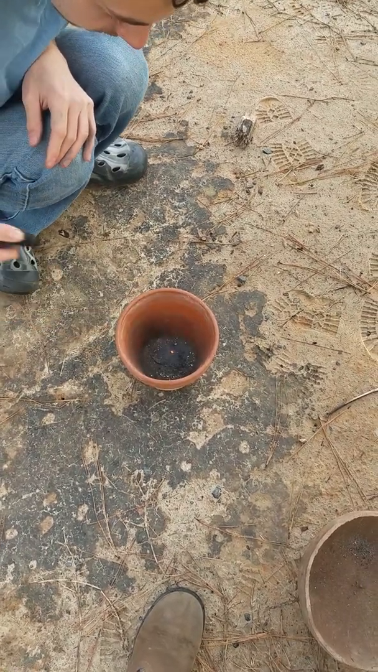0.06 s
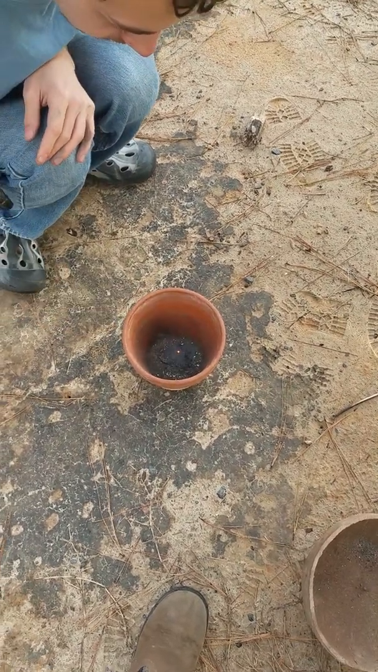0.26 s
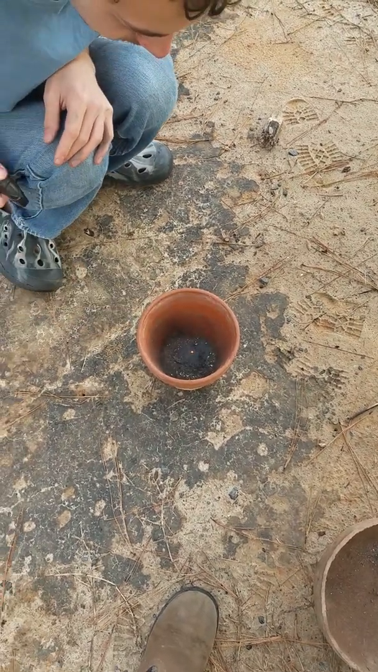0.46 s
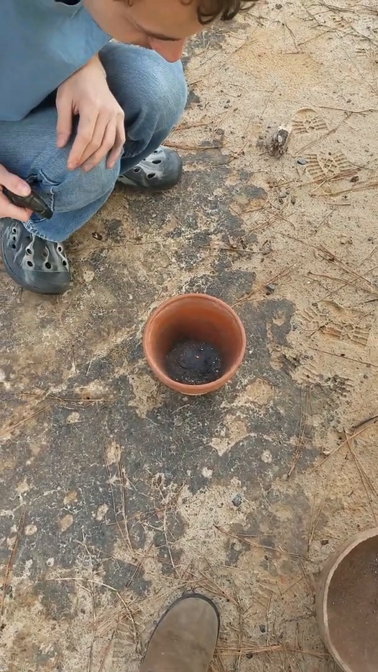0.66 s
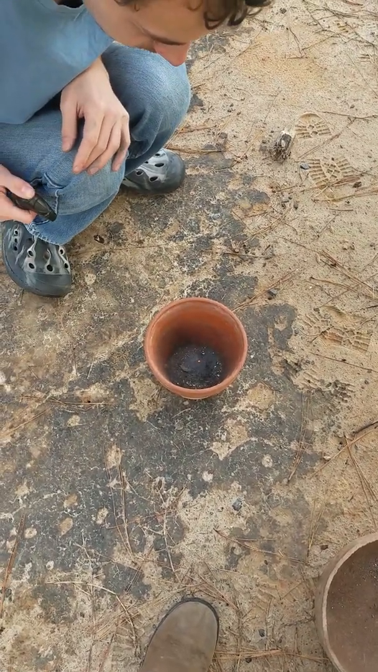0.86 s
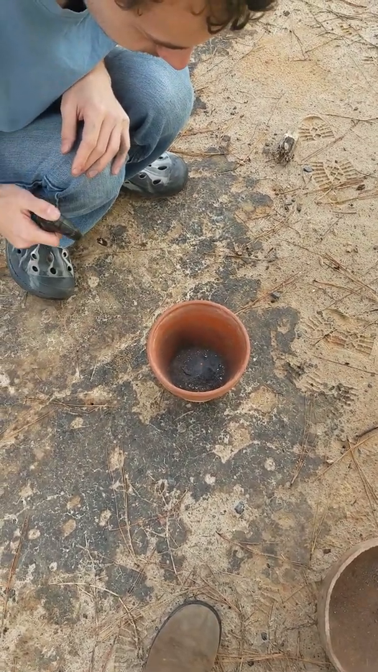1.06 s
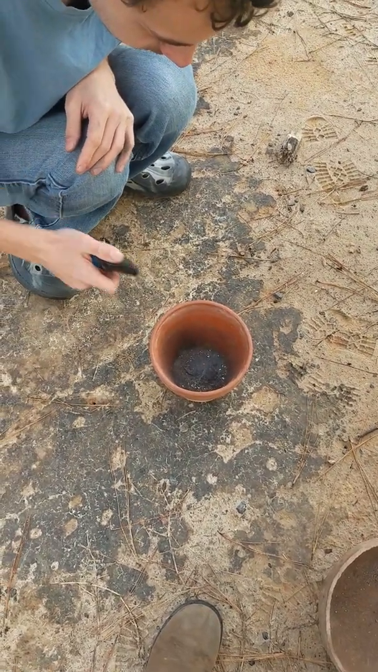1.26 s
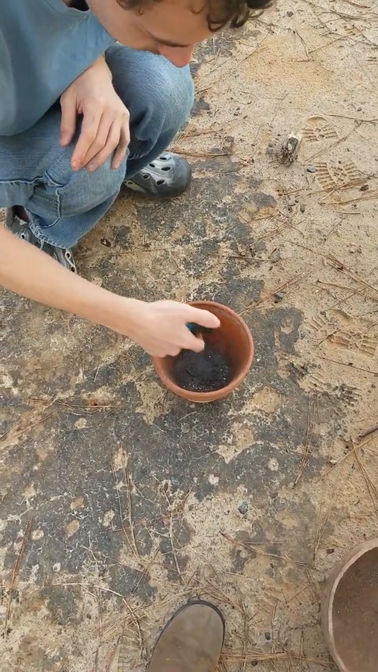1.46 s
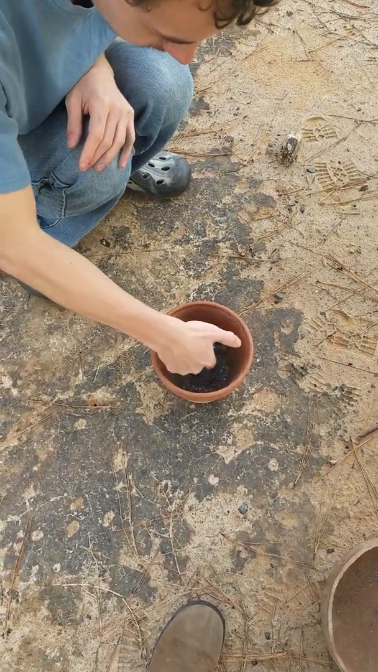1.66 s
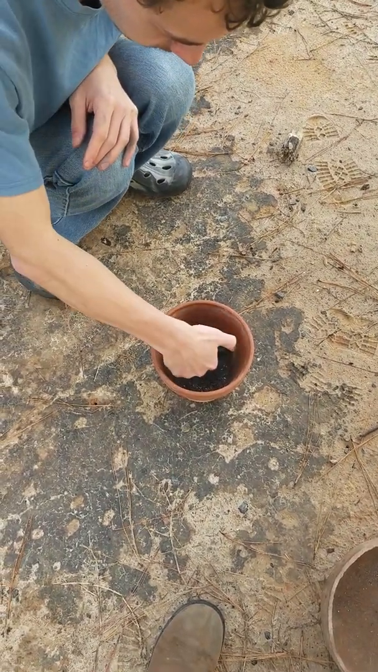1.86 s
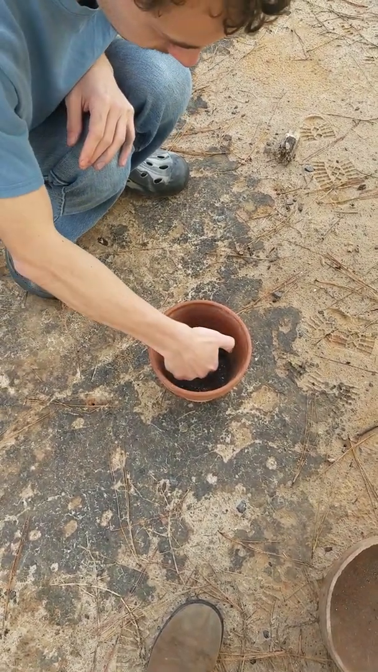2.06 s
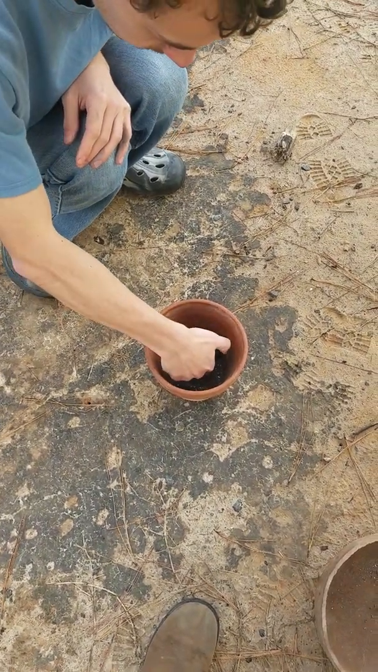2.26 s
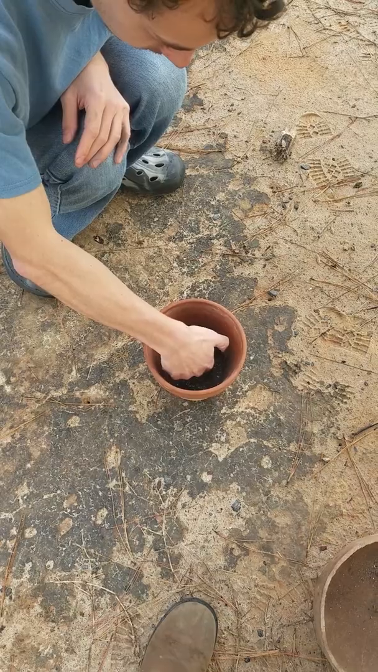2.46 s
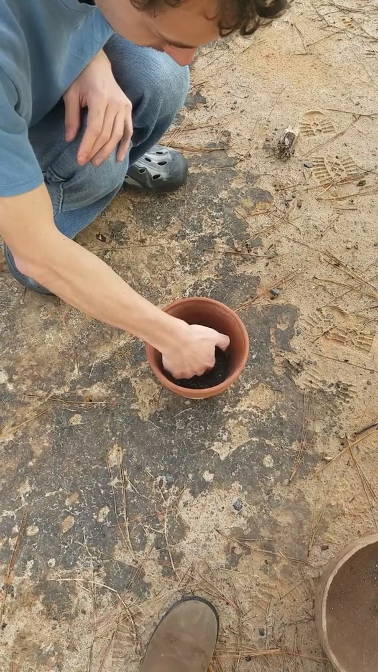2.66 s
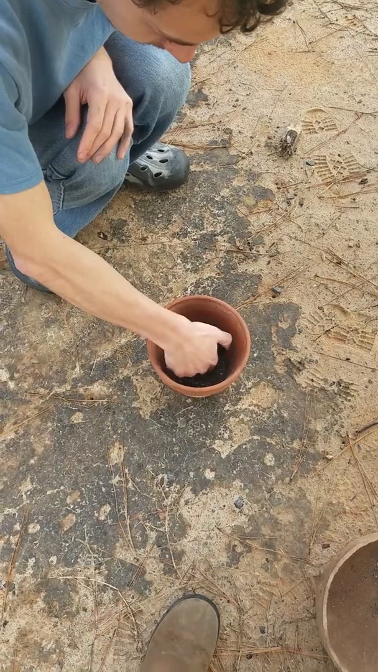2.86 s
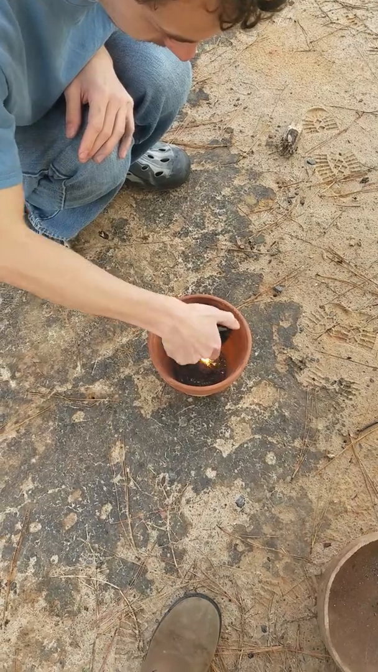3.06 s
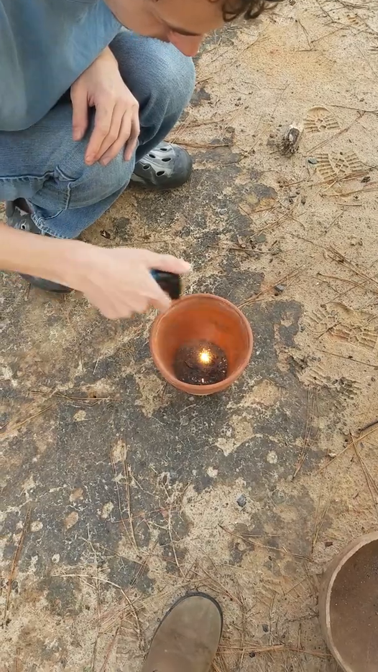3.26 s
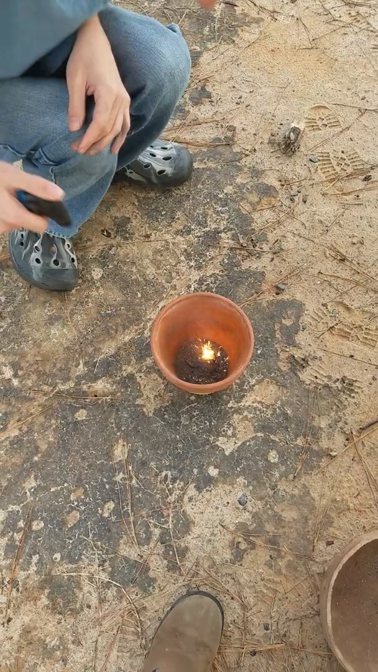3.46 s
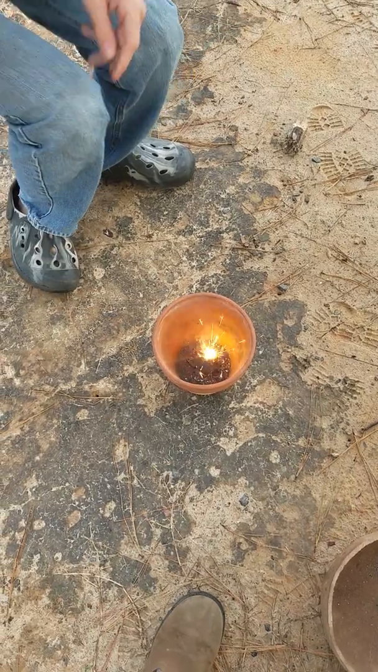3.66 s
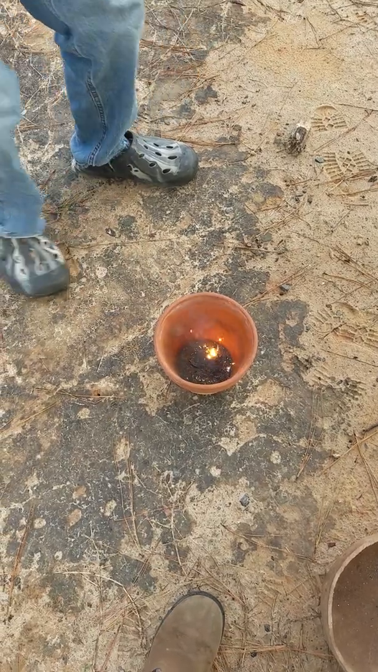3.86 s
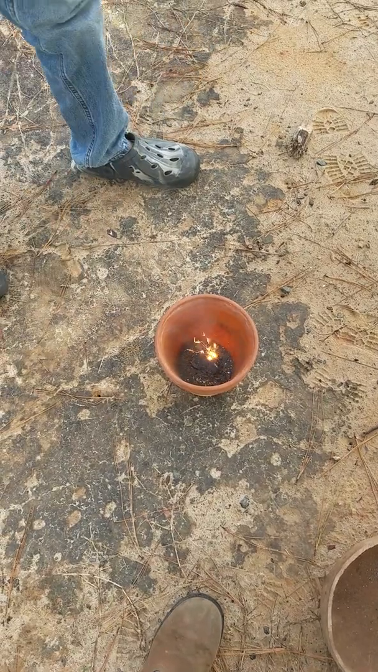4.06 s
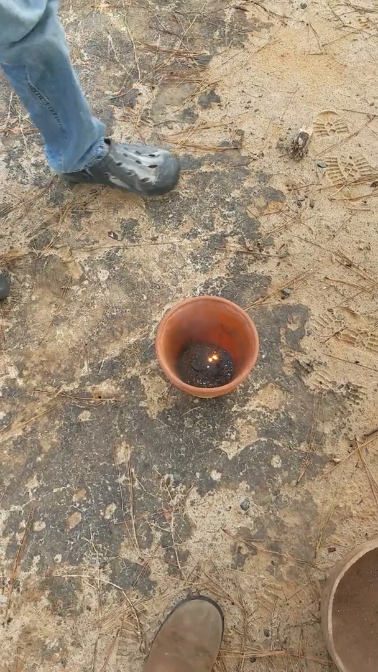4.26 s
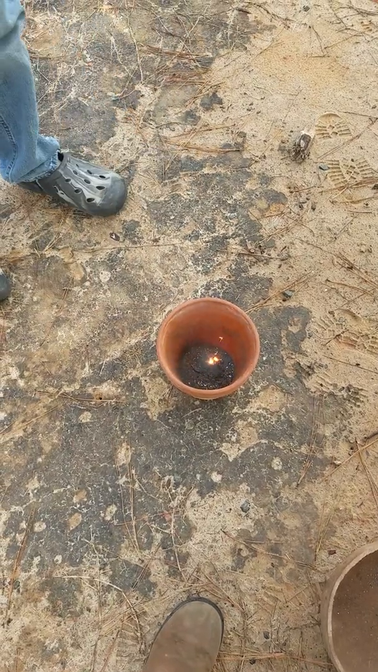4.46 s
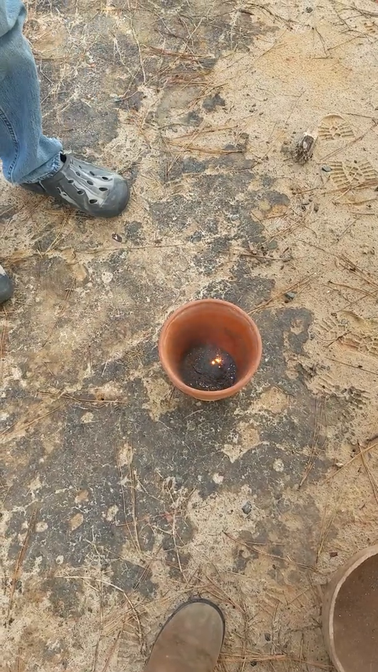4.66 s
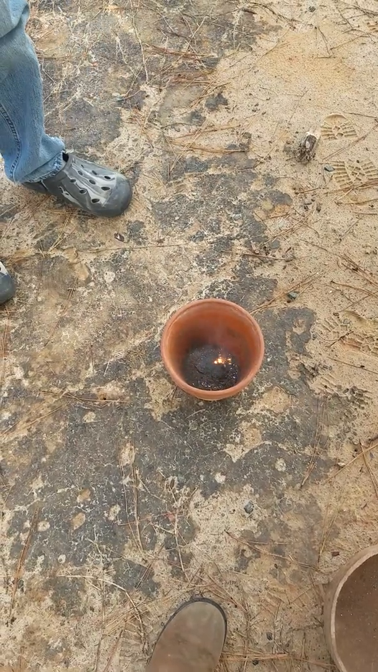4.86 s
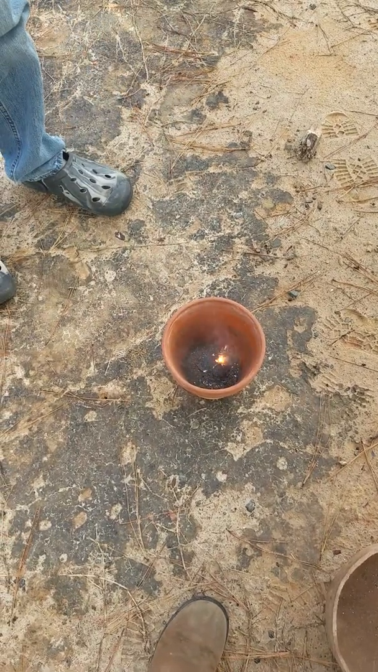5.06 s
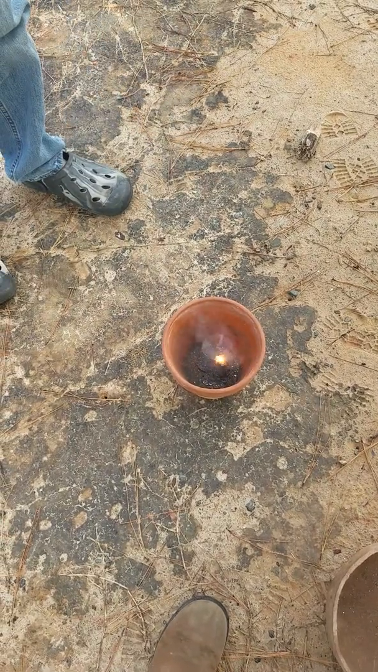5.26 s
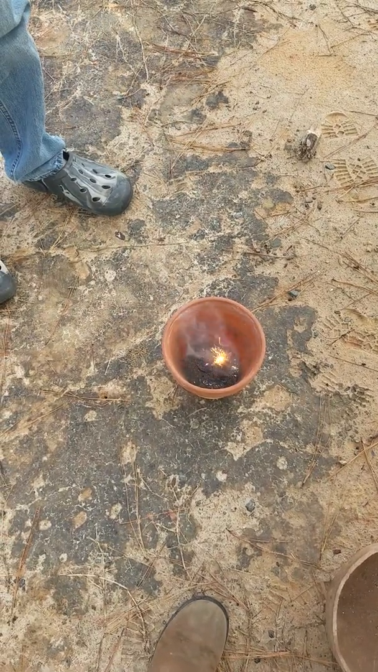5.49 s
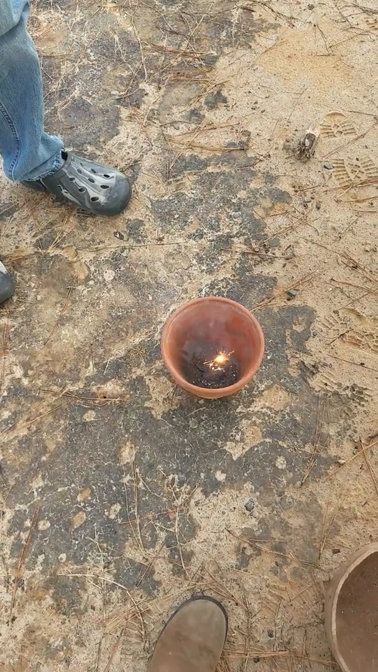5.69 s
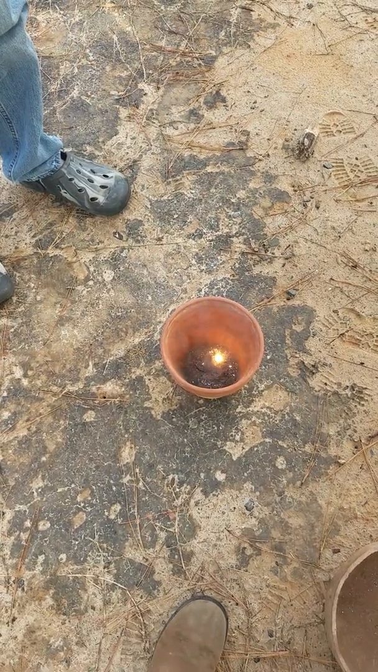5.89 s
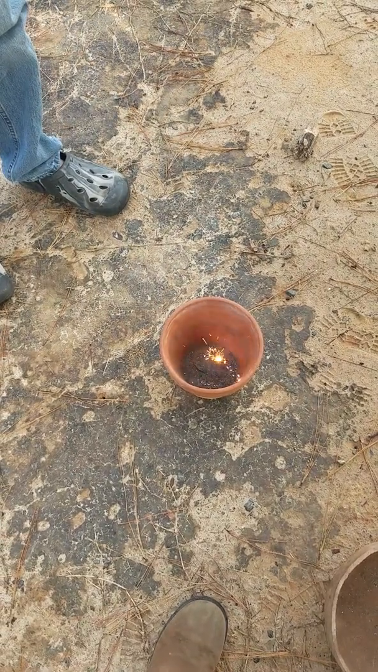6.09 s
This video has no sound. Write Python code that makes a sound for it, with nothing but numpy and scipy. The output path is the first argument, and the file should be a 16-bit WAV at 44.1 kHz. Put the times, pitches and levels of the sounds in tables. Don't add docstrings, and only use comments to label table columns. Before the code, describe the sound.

Outdoors, quiet wind rumble, soft cloth rustle and a faint bird repeating a phrase. Small finger ticks and knocks on a gas torch, then a thin gas hiss and a loud sharp igniter snap. A soft flame roars inside a clay pot until the lever clicks back. Powder catches with uneven hiss, fizzing sparks and dry crackles, while shoes step back on grit. Close stereo handheld microphone, slightly brighter on the right.

```python
import sys
import numpy as np
from scipy import signal
from scipy.fft import rfft, irfft, next_fast_len
from scipy.io import wavfile

SR = 44100
rng = np.random.default_rng(int(sys.argv[2]) if len(sys.argv) > 2 else 0)


def unload_wav(signal):
    wavfile.write(
        sys.argv[1],
        SR,
        np.round(np.clip(np.atleast_2d(signal).T, -1, 1) * 32767).astype(np.int16),
    )


def attenuation_scalar(level_db):
    decades = np.asarray(level_db, float) / 20
    return 10 ** decades


N = 270257
TIME = np.arange(N) / SR
COARSE = TIME[::16]
SIZE = next_fast_len(N + 4096)
FREQS = np.arange(SIZE // 2 + 1) * SR / SIZE
LOG_FREQS = np.log(FREQS + 1)


# time in seconds, level of the roar in dB.
FIRE = [(2.6, -70), (2.75, -67.5), (2.85, -59), (2.92, -63), (3.17, -56), (3.59, -53), (3.73, -48),
        (3.86, -51), (4.02, -48.5), (4.17, -56.5), (4.34, -58.5), (5.04, -53.5), (5.3, -52.5), (6.13, -51)]
# frequency in Hz, left level in dB per Hz, right level in dB per Hz.
BURN_COLOUR = [(230, -5.5, -4), (384, -20.5, -11), (600, -5.5, -2.5), (900, -11, -5), (1320, -12, -1.5),
               (2200, -11, -6), (2800, -18.5, -6), (3500, -16, -10), (4500, -16.5, -13.5),
               (5720, -21.5, -16), (6700, -20, -8), (8300, -27, -9.5), (12000, -18.5, -8),
               (15200, -13, -9.5)]
# start in seconds, peak in dB.
SPUTTERS = [(3.176, -38), (3.42, -37), (3.533, -46), (3.546, -40), (3.641, -37), (3.75, -36), (3.883, -41),
            (3.916, -40), (3.961, -34), (4.044, -35), (4.115, -41), (4.511, -42), (4.761, -39),
            (4.806, -38), (4.856, -40), (5.046, -41), (5.141, -37), (5.225, -37), (5.69, -36), (5.774, -37),
            (5.795, -38), (5.911, -45), (5.93, -34.5), (6.004, -35)]
# start in seconds, peak in dB.
SPARKS = [(3.0435, -50), (3.236, -39), (3.358, -36), (3.423, -37), (3.581, -39), (3.6664, -40),
          (3.7105, -32), (3.7244, -32), (3.7534, -38), (3.841, -37), (3.8844, -37), (3.898, -26.5),
          (3.9854, -33), (4.0294, -39), (4.0794, -42), (4.5524, -42), (4.5764, -37.5), (4.5844, -39),
          (4.6633, -41), (4.6954, -42), (5.012, -39), (5.047, -41), (5.1594, -38), (5.1744, -45),
          (5.2924, -44), (5.4754, -40), (5.4914, -43), (5.5094, -42), (5.5254, -43), (5.6745, -43),
          (5.6895, -35), (5.7054, -36), (5.8451, -43), (5.9733, -42), (6.0182, -42), (6.0314, -40)]
# centre in seconds, lift in dB, half length in seconds.
SHOWERS = [
    (3.6, 2.5, 0.46),
    (4.9, 0, 0.41),
    (3.0, 3, .04),
    (3.31, -8, 0.03),
    (4.18, 1, 0.026),
    (5.55, -3, .02),
]
# centre in seconds, lift over the steady burn in dB, half length in seconds.
SURGES = [(3.368, 6.5, 0.011), (3.426, 4, 0.025), (3.576, 5, 0.085), (3.895, -5.5, 0.029),
          (4.226, 5.5, 0.0069), (4.385, 5.5, 0.027), (4.52, 4.5, 0.028), (4.58, 4, 0.02), (5.0, 2, 0.028),
          (5.19, -5, 0.023), (5.245, -3.5, .014), (5.47, 6, 0.025), (5.583, 3, 0.016), (5.697, 9.5, 0.0063),
          (5.95, 2.5, 0.019), (6.02, 3, 0.019)]
# centre in seconds, level in dB, pitch in Hz, half length in seconds.
WHISTLE = [
    (4.95, -58, 12200, .38),
]


def powder():
    roar_db = level(FIRE)
    roar_gain = attenuation_scalar(roar_db - 1.5) + flashes(SPUTTERS, gain_db=-10.5, dying=0.0012)
    roar = roar_gain * hiss(BURN_COLOUR, 250, 0.5, 2.8, 0.63, low_hz=230, high_hz=5500)
    fizz_db = -62 + 0.98 * (roar_db + 56.5)
    fizz_gain = attenuation_scalar(fizz_db) * bumps(SHOWERS) + flashes(SPARKS, gain_db=-6.5, dying=0.00068)
    fizz = fizz_gain * hiss(BURN_COLOUR, 330, 0.87, 2.4, 0.44, low_hz=5500)
    burn = in_pot(bumps(SURGES, rise_share=0.77) * (roar + fizz))
    return burn + swells(WHISTLE, 0.049) + grains(roar_db)


# frequency in Hz, width in Hz, lift in dB.
POT = [
    (579, 75, 3.5),
    (2214, 256, 7),
    (3400, 810, 5),
    (5690, 190, -18),
    (7600, 870, 1.5),
    (11940, 1300, 4),
]


def in_pot(x):
    shape_db = sum(db / (1 + (2 * (FREQS - hz) / width) ** 2) for hz, width, db in POT)
    return irfft(attenuation_scalar(shape_db) * rfft(x, SIZE), SIZE)[:, :N]


# start in seconds, peak in dB, ring in Hz.
CRACKLES = [(3.204, -37.5, 710), (3.36, -34, 2300), (3.583, -34, 1730), (3.779, -28, 1900),
            (4.029, -39, 2210), (4.552, -39, 2180), (4.576, -44, 2100), (4.591, -44, 3200),
            (4.775, -41, 1500), (5.16, -47, 1670), (5.419, -35, 2090), (5.433, -34, 1440),
            (5.449, -35, 1710), (5.459, -37, 1400), (5.475, -36, 1260), (5.491, -38, 725),
            (5.51, -41, 1500), (5.567, -43, 721), (5.695, -52, 2110), (5.846, -37, 625), (5.973, -43, 619),
            (6.019, -37, 2000)]
# start in seconds, peak in dB, ring in Hz.
PEBBLES = [(3.802, -28, 4200), (3.84, -35, 1750), (3.846, -37, 1230), (3.867, -33.5, 955),
           (3.984, -35, 1060), (4.08, -39, 930), (4.145, -35.5, 784), (4.159, -34.5, 900),
           (4.206, -41, 1140), (4.373, -32.5, 1030), (4.442, -40.5, 1630)]
# start in seconds, peak in dB, ring in Hz.
SPITS = [
    (3.205, -35.5, 2270),
    (3.360, -35.5, 3300),
    (3.711, -39, 4500),
    (3.779, -40, 5500),
    (4.775, -42, 2200),
    (4.807, -48, 2000),
    (5.433, -45, 2200),
    (5.510, -45, 4000),
    (5.706, -43, 9000),
    (5.931, -44, 4500),
]


def grains(roar_db):
    events = cracking(CRACKLES, -9) + cracking(PEBBLES, -11) + cracking(SPITS, -1.5)
    cracks = snaps(events + small_grains(roar_db, count=20), BURN_COLOUR, 0.012)
    wall_hz = 5000
    return signal.lfilter(*signal.butter(1, wall_hz, fs=SR), cracks)


def small_grains(roar_db, count):
    draw = rng.random((count, 3))
    spread_db, crack_db = -5, -7
    first_s = FIRE[3][0]
    s = first_s + draw[:, 0] * (N / SR - first_s)
    db = roar_db[(s * SR).astype(int)] + spread_db * (2 * draw[:, 1] - 1)
    low_hz, high_hz = POT[0][0], POT[2][0]
    hz = low_hz * (high_hz / low_hz) ** draw[:, 2]
    return cracking(zip(s, db, hz), crack_db)


# start in seconds, hold in seconds, level in dB.
JET = [
    (2.03, 0.102, -66.5),
    (2.2, 0.0056, -63),
]
# frequency in Hz, left level in dB per Hz, right level in dB per Hz.
GAS_COLOUR = [(2500, -21, -11.5), (4000, -34, -26.5), (4930, -11.5, -10.5), (5900, -10.5, -17.5),
              (7000, -14.5, -2), (8200, -16.5, 0), (9430, -15.5, -9.5), (10530, -17, -1.5), (12000, -10, 0),
              (13500, -9, -1.5), (15000, -11.5, -9), (15800, -18.5, -11)]
# frequency in Hz, left level in dB per Hz, right level in dB per Hz.
FLAME_COLOUR = [(250, -29.5, -36), (400, -24, -11), (540, -6.5, -5), (900, -15.5, -8), (1680, -10.5, -0.5),
                (2210, -8.5, -7.5), (3370, -31, -16.5), (4220, -30.5, -37), (5700, -32.5, -30),
                (6650, -36.5, -24.5), (8700, -51, -34), (11500, -38.5, -23.5), (13300, -38, -16.5),
                (15800, -44, -36)]


def torch():
    before = TIME < IGNITER[0][0] - .004
    opening = held(JET[:1], rise=0.026, fall=0.026)
    puff = held(JET[1:], rise=.11, fall=.11)
    jet = np.where(before, opening, puff) * hiss(GAS_COLOUR, 0, 0, 0, 0.57, low_hz=2500)
    light_s, burn_out_s = 2.185, 2.94
    blue_flame = (light_s, burn_out_s - light_s, -55)
    afterglow = (burn_out_s, .24, -62)
    whoomp = bumps([(light_s, 3, 0.052)])
    lit = ~before * held([blue_flame, afterglow], rise=.09, fall=0.036) * whoomp
    flame = lit * hiss(FLAME_COLOUR, 0, 0, 0, 0.52, low_hz=250)
    return jet + igniter() + flame + lever()


# start in seconds, level in dB.
IGNITER = [
    (2.1459, -5),
    (2.1464, -4),
    (2.1476, -15.5),
    (2.1496, -13.5),
]
# frequency in Hz, level in dB, time to fall 80 dB in seconds.
SHELL = [(1700, -3.5, 0.057), (2373, -3, 0.05), (3550, 3, 0.026), (5060, -5.5, 0.03), (4990, -6, 0.029),
         (5940, -15, 0.04), (8070, -7, 0.024), (8800, -28.5, 0.082), (9230, -4, 0.023), (10200, -9, 0.035),
         (11480, -22.5, 0.045), (12050, -28.5, 0.07), (12770, -29, 0.088), (13800, -4, 0.033)]
# frequency in Hz, level in dB, t60 in seconds.
THUD = [
    (248, -26, 0.091),
    (380, -15.5, 0.018),
    (665, -18.5, 0.019),
    (2330, -10.5, 0.015),
]


def igniter():
    t, out = np.arange(8192) / SR, np.zeros((2, N))
    for s, db in IGNITER:
        strength = attenuation_scalar(rng.normal(0, 2.3, (2, len(SHELL))))
        noise = rng.standard_normal((2, len(t)))
        modes = [attenuation_scalar(mode_db - 80 * t / t60) * np.sin(2 * np.pi * hz * t) for hz, mode_db, t60 in SHELL]
        signs = np.sign(noise[:, :len(SHELL)])
        ring = attenuation_scalar(-17.0) * (strength * signs) @ modes
        decay = attenuation_scalar(-0.5 - 60 * t / 0.0028) + attenuation_scalar(-14.5 - 60 * t / 0.026) + attenuation_scalar(-52.0 - 60 * t / 0.27)
        out[:, round(s * SR):][:, :len(t)] += attenuation_scalar(db) * (ring + noise * decay)
    thud = sum(attenuation_scalar(thud_db - 60 * t / t60) * np.sin(2 * np.pi * hz * t) for hz, thud_db, t60 in THUD)
    out[:, round(IGNITER[1][0] * SR):][:, :len(t)] += thud
    right_db = at_hz([(150, -16.5), (600, -8.0), (1500, -10.5), (2300, -10.0), (3500, -3.5), (5000, -1.5),
                      (6300, -1.5), (8000, 5.5), (10000, 5.0), (13000, 0.5), (15500, -6.0)])
    left_over_right_db = at_hz([(300, -7.0), (1300, -23), (3000, -10), (5500, -3.0), (8500, -16.5), (14000, -11)])
    blow = ports(*out, right_db + left_over_right_db, right_db, [(300, 0.23), (9000, 0.24)], lead=0)
    rattle = swells([(2.1445, -48, 4300, .0008), (2.15, -25.5, 3500, .002), (2.159, -47, 6200, .002),
                     (2.163, -50, 2000, .004), (2.19, -59.5, 5340, 0.035)], 0.12)
    return rattle + blow


# start in seconds, level in dB, crack over the ring in dB.
RELEASES = [
    (2.9282, -26, -8.5),
    (2.9401, -40, -28),
]
# frequency in Hz, level in dB, swell, dying time and lag in seconds.
LEVER = [
    (2620, -0.5, 0.0007, .0005, 0),
    (2300, -13, 0.0021, .002, 0),
    (5360, -14.5, 0.00032, 0.0019, .0012),
    (3500, -14, .0004, .0012, .0003),
]
# lowest frequency in Hz, swell, dying time and lag in seconds.
LEVER_CRACK = (3600, 0.00068, 0.0016, 0.00062)


def lever():
    t, out = np.arange(-256, 768) / SR, np.zeros((2, N))

    def shape(swell, dying, lag):
        rise = np.exp(-((t - lag) / swell) ** 2)
        return np.where(t < lag, rise, np.exp(-np.maximum(t - lag, 0) / dying))

    lowest_hz, *crack_times = LEVER_CRACK
    highpass = signal.butter(2, lowest_hz, "high", fs=SR)
    for s, db, crack_db in RELEASES:
        noise = rng.standard_normal((2, len(t)))
        waver = .03 * np.cumsum(noise[0])
        rings = sum(attenuation_scalar(ring_db) * shape(*times) * np.sin(2 * np.pi * hz * t + waver)
                    for hz, ring_db, *times in LEVER)
        crack = attenuation_scalar(crack_db) * shape(*crack_times) * signal.lfilter(*highpass, noise)
        out[:, round(s * SR) - 256:][:, :len(t)] += attenuation_scalar(db) * (rings + crack)
    return out * attenuation_scalar(np.array([[-4.0], [2.6]]))


# start in seconds, hold in seconds, level in dB.
CREASES = [
    (.576, 0, -63),
    (.846, 0.014, -80),
]
# frequency in Hz, left level in dB per Hz, right level in dB per Hz.
CLOTH_COLOUR = [(250, -5, -1), (600, -3, -8), (1500, -16, -3), (2500, -10, -5), (4000, -19, -8.5),
                (5500, -14, -8), (6550, -16, -5), (7300, -15, 0), (8700, -29, -4), (10300, -21, -14),
                (11500, -7, -2.5), (13500, -10, -3.5), (15800, -14, -4.5)]
# start in seconds, hold in seconds, level in dB.
STEPS = [
    (3.2, 0.61, -63),
    (3.808, 0.051, -57),
    (4.04, 0.017, -56.5),
    (4.21, 0, -60.5),
    (4.392, 0.059, -61),
    (4.59, 0.014, -66.5),
]
# frequency in Hz, left level in dB per Hz, right level in dB per Hz.
STEP_COLOUR = [(250, -1, 4), (398, 2, -1), (600, -5, -9), (1000, -43, 8), (1500, -15, -3), (2200, -18, -13),
               (3300, -23, -1), (4500, -0.5, 4), (6000, -4, 5.5), (7440, -9, 9.5), (9000, -39, 4.5),
               (11300, 2, 2.5), (13000, -23, -7), (15800, -27, 2)]
# centre in seconds, level in dB, pitch in Hz, half length in seconds.
SCUFFS = [
    (3.845, -47.5, 1130, 0.013),
    (4.005, -48, 1050, 0.019),
    (3.864, -51, 920, 0.0068),
    (4.03, -54, 850, 0.011),
    (4.24, -59, 900, 0.011),
    (4.38, -47.5, 1000, 0.012),
    (4.39, -53, 1440, 0.014),
    (4.412, -54, 1200, 0.016),
]
# start in seconds, peak in dB, ring in Hz.
TICKS = [(0.0314, -46, 1830), (.0335, -48, 3100), (0.1104, -49, 7480), (0.1276, -50, 2500),
         (0.1952, -47, 7510), (1.585, -44, 4500), (0.3137, -57, 7300), (0.438, -52, 3000),
         (0.4633, -54, 1880), (0.5625, -47.5, 2800), (0.5747, -53, 895), (0.6774, -51, 1146),
         (.572, -52, 3450), (1.206, -51, 2600), (1.206, -55, 4310), (1.206, -54, 5250),
         (1.2204, -47.5, 750), (1.586, -53, 2200), (1.586, -54, 3750), (1.586, -51, 5250),
         (2.8464, -40, 2500)]
# start in seconds, peak in dB, ring in Hz, crack over the ring in dB.
KNOCKS = [
    (1.205, -44, 2030, -14),
    (1.585, -44, 1800, -33),
    (1.7703, -51.5, 2100, -27),
]
# frequency in Hz, level in dB, lag in seconds.
TANK = [
    (1750, -17, 0.0),
    (2180, -14, 0.0067),
    (2900, -5.5, 0.0018),
    (5400, -12, 0.0039),
    (6700, -23, 0.0057),
]


def person():
    settle = held([(0.0071, .705, -68)], rise=1, fall=.17) * attenuation_scalar(-12.5 * TIME)
    rubbing = np.maximum(settle, held(CREASES, rise=0.054, fall=0.027))
    cloth = attenuation_scalar(4.5) * rubbing * hiss(CLOTH_COLOUR, 140, 6.8, 2.8, 1.2, low_hz=250)
    treading = held(STEPS, rise=0.34, fall=0.42)
    grit = attenuation_scalar(5.5) * treading * hiss(STEP_COLOUR, 220, -0.78, 3.7, 1.0, low_hz=249)
    tank_crack_db = -23
    rings = [(s + lag, db + ring_db, hz, tank_crack_db)
             for s, db, _, _ in KNOCKS for hz, ring_db, lag in TANK]
    ticks = snaps(cracking(TICKS, -16.5) + KNOCKS + rings, STEP_COLOUR, 0.011)
    scuffs = swells(SCUFFS + [(.9, -66.5, 600, 0.044)], 0.24)
    return notched(cloth + grit) + scuffs + ticks


def notched(x):
    hz, width_hz, share = 5770, 300, .6
    thinned = signal.lfilter(*signal.iirnotch(hz, hz / width_hz, SR), x)
    return x + share * (thinned - x)


# centre in seconds, lift over the mean wind in dB, half length in seconds.
GUSTS = [
    (0.0, -9.5, 0.12),
    (.25, -0.5, 0.37),
    (2.4, -1.5, 0.41),
    (2.92, 6, 0.03),
    (3.2, 1.5, 0.29),
    (3.47, -4, 0.039),
    (3.75, 2.5, 0.4),
]
# frequency in Hz, left level in dB per Hz, right level in dB per Hz.
AIR_COLOUR = [(25, -19, -17), (51.3, -6, -5.5), (74, -3, -2), (92, -1.5, 0), (109.4, -3.5, -1.5),
              (130.6, -7.5, -5), (197, -17, -15), (375, -24, -21.5), (960, -29, -24.5), (2500, -33.5, -32),
              (4000, -38.5, -36), (5950, -44.5, -43), (9000, -51, -48.5), (11000, -46.5, -47.5),
              (13950, -36.5, -38), (15700, -35, -42)]
# frequency in Hz, likeness from 0 to 1.
AIR_LIKENESS = [(60, 0.98), (140, 0.97), (300, 0.77), (600, 0.26), (2000, 0), (8000, 0)]
# centre in seconds, level in dB, pitch in Hz, half length in seconds.
SQUEAKS = [
    (.77, -75, 1960, .015),
    (.835, -74, 1990, .015),
    (.92, -72, 1262, 0.04),
    (1.04, -73.5, 1260, 0.053),
    (1.54, -75, 1980, .02),
]


def background():
    wind_hiss = hiss(AIR_COLOUR, 0, 0, 0, 0.88, high_hz=211, likeness=AIR_LIKENESS, lead=0)
    wind = attenuation_scalar(-52) * bumps(GUSTS) * wind_hiss
    far = attenuation_scalar(-63.5) * hiss(AIR_COLOUR, 0, 0, 0, 0.58, low_hz=189.0, likeness=AIR_LIKENESS, lead=0)
    return wind + far + swells(SQUEAKS, 0.015) + bird()


# centre in seconds, level in dB, from Hz, to Hz, half length in seconds.
PHRASE = [
    (0.014, -71, 2840, 2600, 0.0146),
    (.03, -73, 3400, 3200, 0.0133),
    (.09, -73, 2640, 3050, .014),
    (.13, -79, 4600, 4800, .01),
    (0.157, -75, 2800, 3500, 0.022),
    (.21, -79, 3250, 3100, .015),
]
# start in seconds, level in dB.
PHRASE_AT = [
    (.31, -5),
    (0.662, 1),
    (1.009, 0.5),
    (1.36, 1.5),
    (1.71, 0.5),
]


def bird():
    out = np.zeros(N)
    t = np.arange(-2048, 2048) / SR
    for start, phrase_db in PHRASE_AT:
        for s, db, from_hz, to_hz, half in PHRASE:
            glide = (from_hz + to_hz) / 2 + (to_hz - from_hz) * np.clip(t / half / 2, -1, 1)
            pitch = rng.normal(1, 0.0111) * glide
            waver = 0.048 * np.cumsum(rng.standard_normal(len(t)))
            tone = np.sin(2 * np.pi * np.cumsum(pitch) / SR + waver)
            flutter = 1 + 0.39 * np.sin(2 * np.pi * 70 * t)
            at = round((start + s) * SR) - 2048
            out[at:at + 4096] += attenuation_scalar(db + phrase_db) * np.exp(-(t / half) ** 2) * tone * flutter
    return out * attenuation_scalar(np.array([[-3.0], [2.0]]))


# frequency in Hz, likeness from 0 to 1.
NEAR_LIKENESS = [(300, 0.85), (2200, 0.85), (4300, 0.85), (5200, 0.66), (8000, 0.96), (10500, 0.75),
                 (14000, 0.9)]


def hiss(colour, per_s, grain_db, spread_db, flicker_db, low_hz=20, high_hz=16500,
         likeness=NEAR_LIKENESS, lead=1):
    sizes = np.minimum(rng.exponential(1, N), 4)
    born = rng.random(N) < per_s * attenuation_scalar(3.5 * drift(5.0)) / SR
    sizes[born] = attenuation_scalar(grain_db + spread_db * sizes[born])
    bursts = signal.lfilter([1], [1, -.92], sizes * born + 1e-18)
    swell = (1 + bursts) * attenuation_scalar(flicker_db * (drift(30.0) + 1.13 * drift(9.1)))
    band_db = -10 * np.log10((1 + (low_hz / (FREQS + 1)) ** 8) * (1 + (FREQS / high_hz) ** 8))
    direct, scattered = swell * rng.standard_normal((2, N))
    left_db, right_db = at_hz(colour) + band_db, at_hz(colour, column=2) + band_db
    both = ports(direct, scattered, left_db, right_db, likeness, lead)
    return both / np.sqrt(np.mean(both.mean(0) ** 2))


def drift(rate):
    r = np.exp(-80 * np.pi * rate / SR)
    slow = signal.lfilter([1], [1, -2 * r, r * r], rng.standard_normal(N // 40 + 2002))[2000:]
    return np.interp(np.arange(N) / 40, np.arange(len(slow)), rms_one(slow))


def swells(events, width):
    out = np.zeros((2, N))
    noise = rng.standard_normal((2, N))
    for s, db, hz, half in events:
        band = signal.butter(2, [hz * (1 - width), hz * (1 + width)], "band", fs=SR, output="sos")
        span = slice(round((s - 3 * half) * SR), round((s + 3 * half) * SR))
        bell = np.exp(-((TIME[span] - s) / half) ** 2)
        out[:, span] += attenuation_scalar(db) * rms_one(signal.sosfilt(band, noise[:, span])) * bell
    return ports(*out, -4.5, 4.6, NEAR_LIKENESS)


def snaps(events, colour, t60):
    out = np.zeros((2, N + 2048))
    noise = rng.standard_normal((len(events), 2, 2048))
    for (s, db, hz, crack_db), pair in zip(events, noise):
        out[:, round(s * SR):][:, :2048] += [attenuation_scalar(db) * snap(hz, t60, crack_db, v) for v in pair]
    left_over_right_db = at_hz(colour) - at_hz(colour, column=2)
    return ports(*out[:, :N], left_over_right_db + 0.069, 0.073, NEAR_LIKENESS)


def snap(hz, t60, crack_db, noise):
    t = np.arange(len(noise)) / SR
    blow = noise * np.exp(-t / 0.0012) + 4.8 * (np.arange(len(t)) == 2)
    crack = signal.lfilter([1, 0, -.6], [1, -.35], blow)
    tone = np.sin(2 * np.pi * hz * t + 0.13 * np.cumsum(noise))
    ring = tone * attenuation_scalar(-60 * t / t60) * np.minimum(t / 0.00033, 1)
    return ring / np.abs(ring).max() + attenuation_scalar(crack_db + 16.0) * crack / np.abs(crack).max()


def cracking(events, crack_db):
    return [(*row, crack_db) for row in events]


def flashes(events, gain_db, dying):
    s, db = np.transpose(events)
    starts = np.full(N, 1e-18)
    starts[(s * SR).astype(int)] = attenuation_scalar(db + gain_db)
    return signal.lfilter([1], [1, -np.exp(-1 / (dying * SR))], starts)


def held(events, rise, fall):
    curves = []
    for s, hold, db in events:
        away = np.maximum((s - COARSE) / rise, (COARSE - s - hold) / fall)
        curves.append(db - 30 * np.maximum(away, 0))
    return np.interp(TIME, COARSE, attenuation_scalar(np.max(curves, axis=0)))


def bumps(events, rise_share=1):
    db = sum(db * np.exp(-((COARSE - s) / half / np.where(COARSE < s, rise_share, 1)) ** 2)
             for s, db, half in events)
    return np.interp(TIME, COARSE, attenuation_scalar(db))


def level(rows):
    s, db = np.transpose(rows)
    return np.interp(TIME, np.r_[s[0] - .004, s], np.r_[-130, db])


def at_hz(table, column=1):
    rows = np.array(table)
    return np.interp(LOG_FREQS, np.log(rows[:, 0]), rows[:, column])


def rms_one(x):
    return x / np.sqrt(np.mean(x ** 2) + 1e-20)


# frequency in Hz, lead in radians.
LEFT_LEAD = [(0, 0), (4600, 0.88), (5500, 1.5), (6300, 7.5), (8000, 6.5), (10000, 11), (11200, 10.5),
             (14000, 10.5), (15500, 22)]


def ports(direct, scattered, left_db, right_db, likeness, lead=1):
    alike = np.clip(at_hz(likeness), 0, 1)
    shift = np.exp(1j * lead * np.interp(FREQS, *np.transpose(LEFT_LEAD)))
    direct, scattered = rfft(direct, SIZE), rfft(scattered, SIZE)
    left = attenuation_scalar(left_db) * (alike * shift * direct + np.sqrt(1 - alike ** 2) * scattered)
    return irfft(np.array([left, attenuation_scalar(right_db) * direct]), SIZE)[:, :N]


def scene():
    return powder() + torch() + person() + background()


def roll_off(x):
    return signal.sosfilt(signal.butter(12, 17090, fs=SR, output="sos"), x)


def record(dry):
    ceiling, top_hz = 0.81, 16000
    rounded = ceiling * np.tanh(dry / ceiling)
    top = signal.cheby2(22, 34, top_hz, fs=SR, output="sos")
    return roll_off(signal.sosfilt(top, rounded))


dry = scene()
out = record(dry)
unload_wav(out)
```